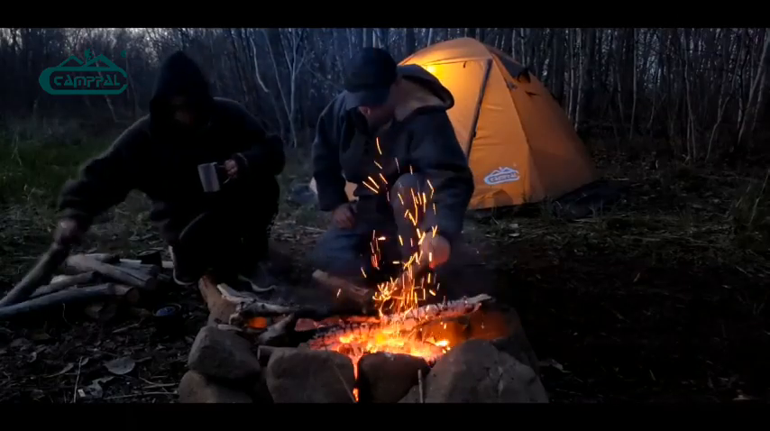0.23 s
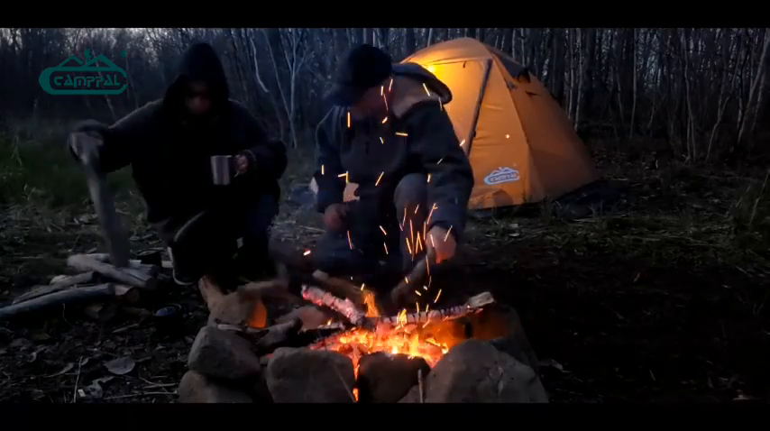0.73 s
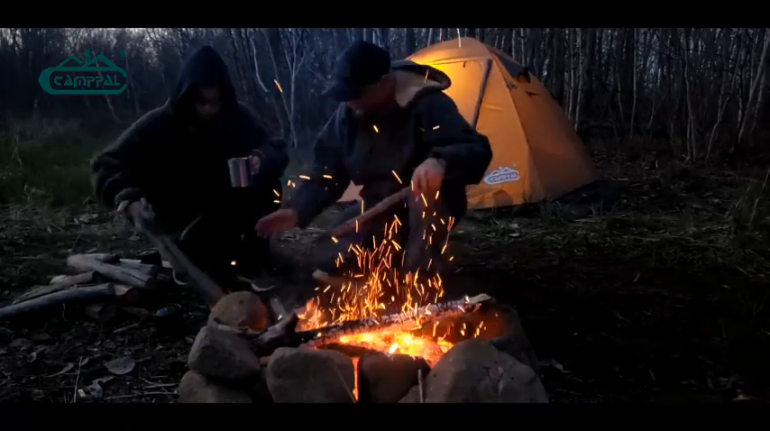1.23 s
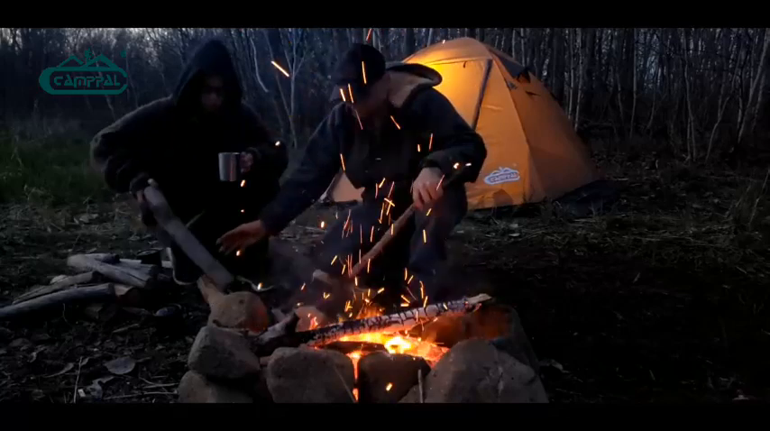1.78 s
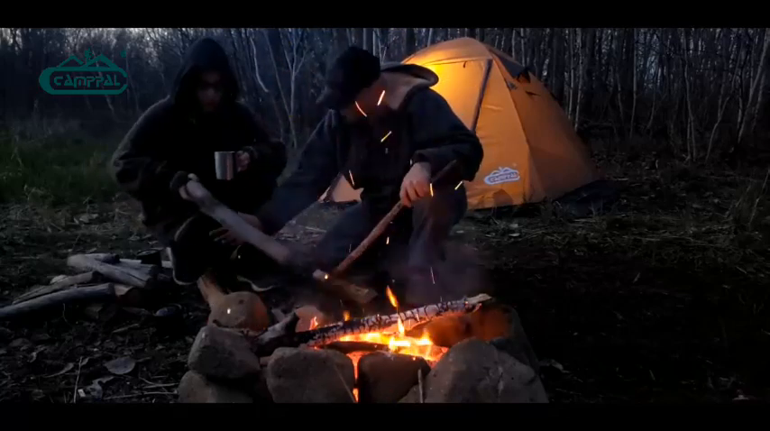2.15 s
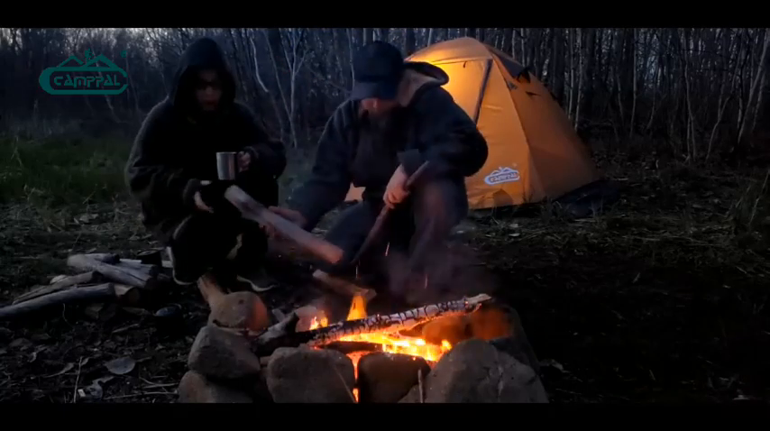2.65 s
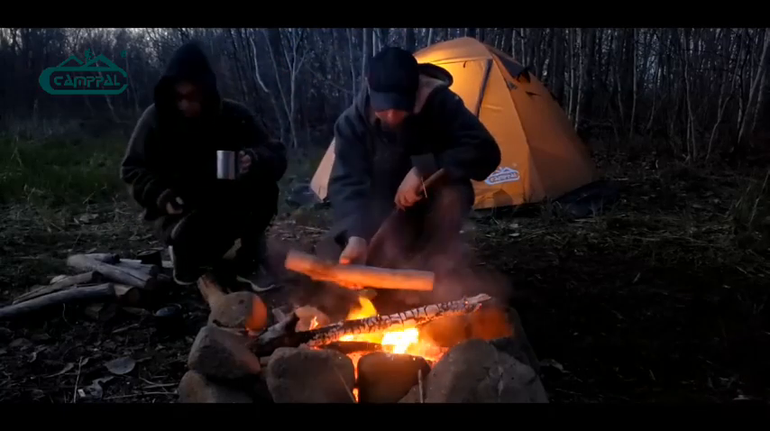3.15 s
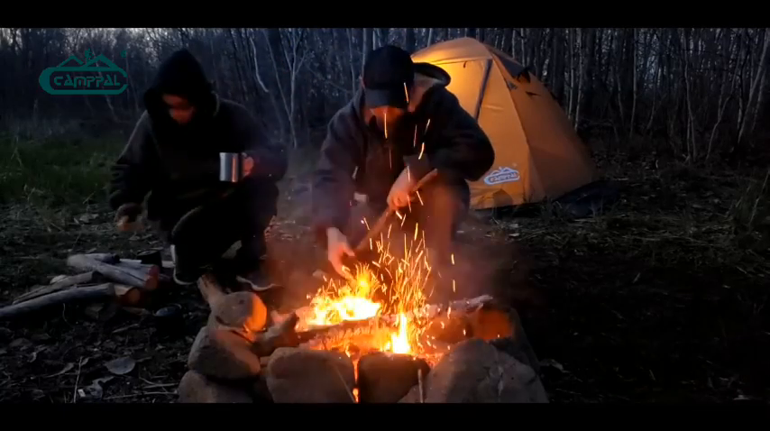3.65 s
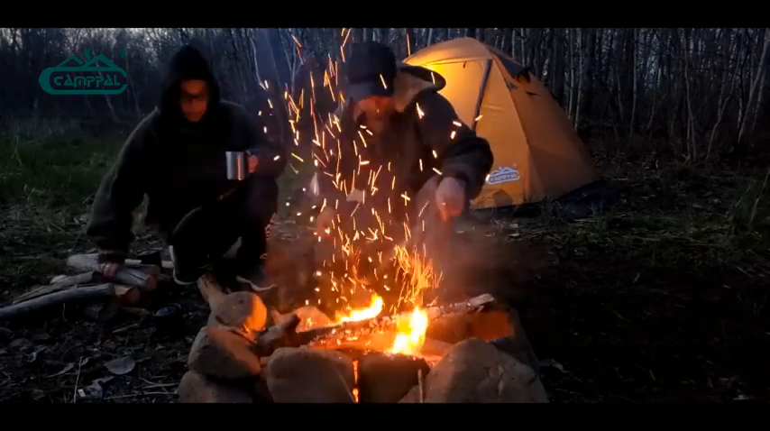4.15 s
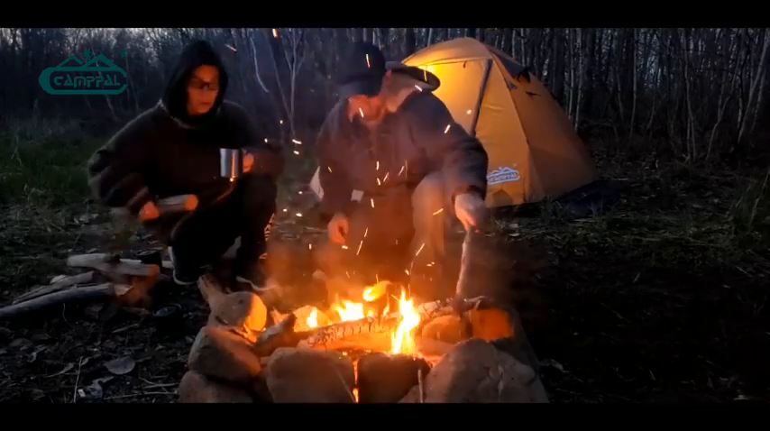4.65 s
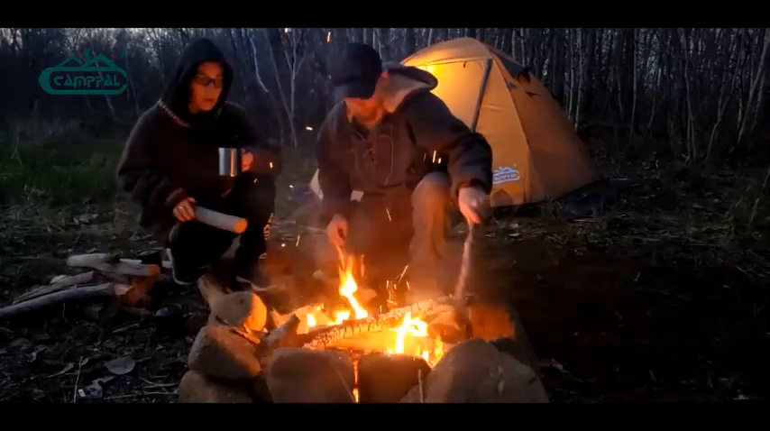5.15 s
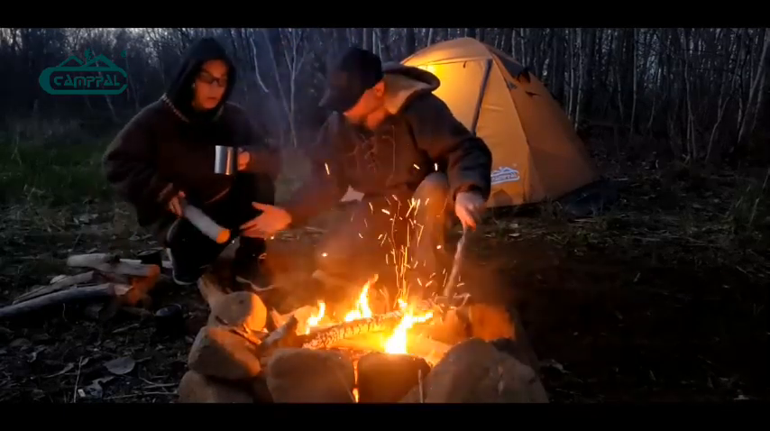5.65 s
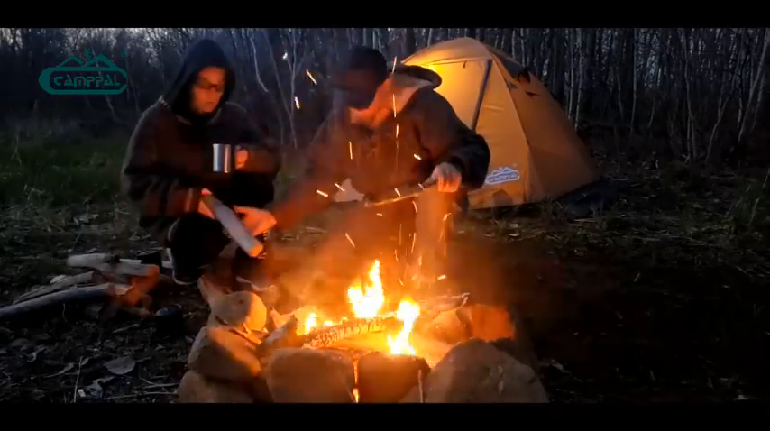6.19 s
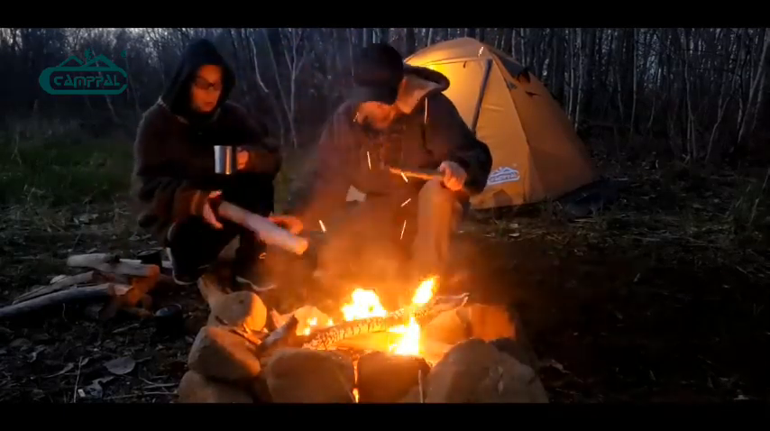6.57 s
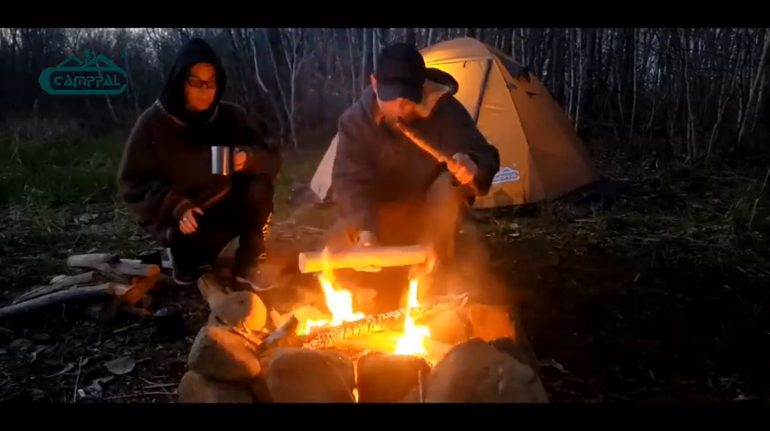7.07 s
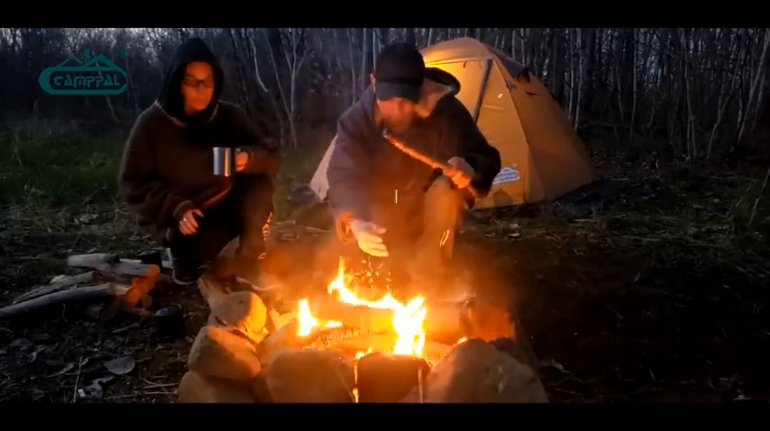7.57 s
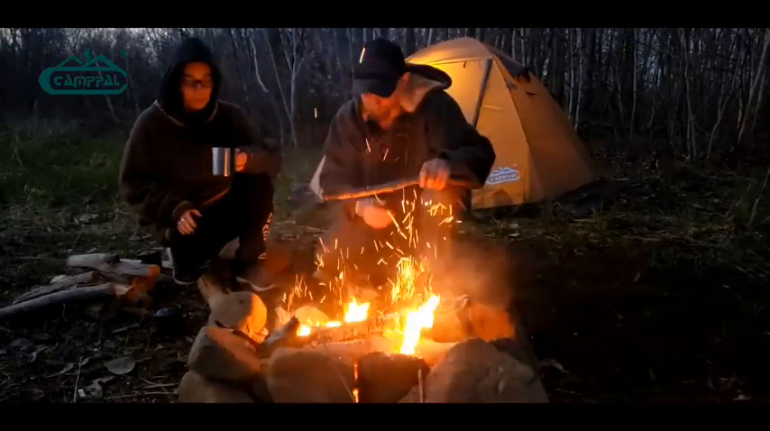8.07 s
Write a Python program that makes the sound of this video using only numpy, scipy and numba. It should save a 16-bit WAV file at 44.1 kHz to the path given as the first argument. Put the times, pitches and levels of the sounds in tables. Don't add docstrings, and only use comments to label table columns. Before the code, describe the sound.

Hundreds of high, short rising frog whistles blur into a steady ringing wall, with nearby embers snapping, wood knocking and flames throbbing low.

```python
import sys
import numpy as np
from scipy import signal
from scipy.fft import rfft, irfft
from scipy.io import wavfile
from scipy.ndimage import uniform_filter1d
from numba import njit

SR = 44100
rng = np.random.default_rng(int(sys.argv[2]) if len(sys.argv) > 2 else 0)


def volts_from_decibels(level):
    exponent = np.asarray(level, float) / 20
    return 10 ** exponent


def pcm_store(signal):
    levels = np.round(np.clip(np.atleast_2d(signal), -1, 1) * 32767)
    wavfile.write(sys.argv[1], SR, levels.astype(np.int16).T)


N = 367353

# t/s, level/dB
CHORUS = [
    (0.0, -16),
    (2.8, -16),
    (5.2, -15.5),
    (5.5, -14.5),
    (5.6, -17.5),
    (5.88, -17),
    (5.96, -16),
    (8.33, -16),
]
# middle t/s, f/Hz, level/dB
NEAR_PEEPS = [(0.968, 3070, -21), (1.173, 2720, -21), (1.498, 2910, -19), (1.704, 2734, -23.5),
              (1.899, 2848, -16.5), (2.629, 2762, -19), (2.753, 2690, -18), (2.788, 2950, -25),
              (2.894, 2870, -15), (3.132, 2974, -27), (3.38, 2726, -21.5), (3.492, 2805, -18.5),
              (3.612, 3073, -20), (3.76, 2842, -19.5), (4.074, 3003, -22), (4.277, 2670, -21),
              (4.722, 3064, -16.5), (4.819, 3027, -18.5), (5.036, 2926, -16.5), (5.319, 2990, -16.5),
              (5.37, 3140, -26), (5.45, 2906, -16), (5.947, 2760, -22.5), (5.974, 3076, -17),
              (6.134, 2928, -15), (6.548, 2880, -18), (6.6, 3020, -19), (6.941, 3040, -17.5),
              (8.118, 2656, -19), (8.279, 2903, -21)]
PARTIAL_DB = (-30.5, -35, -52.5)
FROG_HZ, FROG_SPREAD_HZ = 2994, 200
PEEP_S, RISE_HZ_PER_S = .082, 2700
WOODS_T60_S, WOODS_DB = 1, -5

# t/s, crackle level/dB
STIR = [(0.0, -55.5), (0.3, -50), (0.55, -43), (0.72, -59), (1.38, -59), (1.46, -72.5), (3.34, -66),
        (3.44, -55), (3.64, -55.5), (3.76, -63), (4.94, -59), (5.03, -50), (5.2, -49), (5.36, -57.5),
        (5.62, -58), (5.74, -78), (7.5, -65), (8.33, -69.5)]
# t/s, rumble level/dB, crackle level/dB, length/s
SETTLE = [
    (0.046, -49, -49, 0.087),
    (1.058, -52.5, -63, 0.37),
    (1.332, -45.5, -64.5, 0.13),
    (3.443, -36.5, -52, 0.3),
    (5.15, -53, -57.5, .12),
    (7.55, -35.5, -56.5, 0.071),
    (7.705, -40.5, -54.5, 0.17),
]
# t/s, throb level/dB
PUFFS = [(.31, -38), (.61, -40), (.92, -42), (1.07, -46), (1.23, -39), (1.389, -42), (1.69, -44),
         (1.86, -41.5), (2.12, -34), (2.43, -34.5), (2.75, -43), (2.9, -44.5), (3.42, -37), (3.67, -41),
         (3.98, -34), (4.25, -44.5), (4.45, -43), (4.73, -41), (4.89, -33), (5.2, -38), (5.54, -40.5),
         (5.84, -42), (6.471, -39), (6.779, -35), (7.06, -37), (7.22, -42.5), (7.63, -34.5), (7.8, -37),
         (7.94, -40), (8.27, -44)]
# t/s, flutter level/dB
FLAPS = [(.1, -47), (.23, -40.5), (1.12, -43), (1.39, -41.5), (3.42, -39), (3.57, -38.5), (4.68, -40),
         (4.86, -41), (5.11, -43.5), (5.24, -43.5), (5.34, -43), (5.52, -42), (7.58, -40), (7.78, -31)]
PUFF_S, FLAP_S, THROB_DB, FLUTTER_DB = .13, .08, -45.5, -50.5
COALS_DB, COALS_FOLLOW = -54, 0.22

# t/s, snap level/dB, body level/dB, thud level/dB, fade by 60 dB/s
BREAKS = [(.0409, -28.5, -26, -24.5, 0.011), (.088, -30.5, -42, -27, 0.05),
          (.1119, -35.5, -45, -19.5, 0.011), (.3893, -31, -26, -18, .015), (.5568, -36.5, -21, -24, 0.0098),
          (.8106, -16.5, -8.5, -16, 0.039), (.963, -35, -33, -30, 0.11), (1.0733, -26, -19.5, -20, .04),
          (1.3287, -41, -27.5, -31, 0.11), (1.6254, -51.5, -33.5, -27.5, .016),
          (2.1486, -31, -10, -24, 0.009), (3.375, -45, -27, -24.5, 0.053),
          (3.421, -23.5, -10.5, -19.5, 0.058), (3.4819, -32, -28, -21, 0.072),
          (3.6206, -25, -29, -38, 0.022), (4.3785, -14, -12.5, -19.5, 0.0096),
          (4.5929, -31.5, -37, -32, 0.038), (5.2435, -55.5, -42, -33, 0.069),
          (5.4845, -25, -40, -21, 0.012), (7.5371, -17, -20, -27, 0.048), (7.7044, -24, -26, -17.5, .087),
          (7.737, -6, -15.5, -22, .02), (7.8178, -46, -37, -30.5, 0.036), (7.859, -39.5, -39, -26, .014)]
# t/s, snap level/dB, body level/dB
SPARKS = [(.0068, -36.5, -40), (0.0546, -35.5, -34), (0.2397, -33.5, -23), (0.2693, -31.5, -32),
          (0.3098, -30, -21), (.4, -19, -27), (.421, -29.5, -29), (.438, -32, -38), (0.4896, -28, -32),
          (0.5057, -32.5, -26), (.572, -30, -26), (0.7414, -34.5, -39), (0.775, -34, -43),
          (0.8919, -24.5, -16), (2.8958, -45.5, -33.5), (3.3545, -31, -37), (3.5339, -36, -28),
          (4.3617, -49, -26.5), (4.5202, -36, -36), (4.7454, -23.5, -30), (5.026, -33.5, -28),
          (5.0439, -37.5, -30), (5.0999, -44.5, -37), (5.3197, -44.5, -34), (5.714, -49, -37),
          (6.5271, -40, -25), (6.862, -37.5, -40.5), (7.2532, -29.5, -44), (7.779, -26.5, -31),
          (8.1099, -39, -40.5)]
# t/s, snap level/dB, body level/dB
CRUNCHES = [(.0702, -36, -27.5), (0.1225, -38.5, -29), (.334, -41, -39), (.368, -27.5, -33),
            (.41, -30.5, -33.5), (0.5371, -41, -36), (.606, -36, -48), (.63, -48, -51), (0.6734, -44, -49),
            (0.7006, -40, -49), (0.8381, -36, -31), (.878, -38.5, -30), (0.9768, -48, -35),
            (1.091, -37.5, -24.5), (1.1752, -43.5, -46), (1.2537, -46, -35), (1.302, -46, -38),
            (1.372, -46, -49), (1.408, -44.5, -43.5), (3.57, -68, -26.5), (3.61, -43, -53),
            (5.1642, -32, -33.5), (5.296, -43, -59), (5.535, -42.5, -49), (5.5632, -36, -48),
            (5.6076, -39.5, -62), (7.585, -43, -49), (7.7977, -35.5, -51)]
# low f/Hz, high f/Hz
CRACK_BANDS = [
    (11000, 15500),
    (6800, 11000),
    (2300, 5300),
    (600, 2300),
    (110, 600),
]
SPARK_T60_S, CRUNCH_T60_S = .007, .085
EDGE_DB, SIZZLE_DB = 3, -17
SPARK_THUD_DB, CRUNCH_THUD_DB = -15, -13
GROUND_LAG_S, GROUND_DB = .006, -20

# t/s, peak level/dB, ring f/Hz, fade by 60 dB/s
KNOCKS = [(.391, -13, 980, 0.074), (.555, -15, 753, 0.02), (.812, -24, 1470, .04), (.812, -19, 305, 0.036),
          (1.088, -21, 1530, 0.13), (3.378, -27, 210, .06), (3.465, -26, 170, .2), (7.79, -39, 3930, .06),
          (3.372, -25.5, 1020, 0.15), (3.425, -19.5, 312, 0.11), (7.549, -21, 398, 0.04),
          (7.546, -31, 1017, 0.1), (7.562, -27, 70, .4), (7.705, -19, 617, .05), (2.149, -22, 1500, .022),
          (7.749, -27, 98.7, .4)]

# start t/s, length/s, low f/Hz, upward slur/Hz, level/dB
BIRD_NOTES = [(1.157, .2, 2325, 5.5, -58), (2.83, 0.27, 2316, -0.5, -57), (3.21, 0.17, 2140, 169.5, -55),
              (3.48, 0.34, 2270, 200, -53), (3.66, 0.23, 2345, 4.5, -56), (4.428, 0.27, 2210, 216, -57.5),
              (5.95, 0.16, 2090, 147.5, -59), (6.085, .35, 2066, 267.5, -49.5),
              (6.448, 0.2, 2225, 221, -51.5), (6.738, 0.045, 2320, 57.5, -50),
              (7.4, .31, 2080, 203.5, -47.5), (7.844, 0.23, 2260, 196, -56.5)]
DROP_HZ, DROP_S, SLUR_HZ_PER_S, TOP_S = 70, .018, 1500, .05

# f/Hz, level/dB per Hz
AIR_COLOUR = [(25, -15.5), (70, 2), (100, -6.5), (200, 0), (330, -11.5), (520, -23.5), (850, -9.5),
              (1200, -16.5), (2200, -13.5), (3800, -15), (5200, -30), (7000, -32.5), (10000, -37.5),
              (13000, -46.5)]
AIR_DB = -44


def band(x, lo_hz, hi_hz, order=2):
    sos = signal.butter(order, [lo_hz, hi_hz], "bandpass", fs=SR, output="sos")
    return signal.sosfilt(sos, x) * np.sqrt(SR / 2 / (hi_hz - lo_hz))


def level(x, db):
    return x * volts_from_decibels(db) / np.sqrt(np.mean(x ** 2))


def curves(table):
    s, *columns = np.transpose(table)
    return [np.interp(np.arange(N) / SR, s, c) for c in columns]


def walk(rate):
    k = int(SR / rate)
    steps = np.repeat(rng.standard_normal(N // k + 1), k)
    return uniform_filter1d(uniform_filter1d(steps, k), k)[:N]


def grit(count, scatter_db, lump_db):
    lumps = np.minimum(rng.exponential(size=count // 48 + 1), 5.0)
    lumps = np.repeat(lumps, 48)[:count]
    specks = np.minimum(rng.exponential(size=count), 6.0)
    return level(rng.standard_normal(count) * volts_from_decibels(scatter_db * specks + lump_db * lumps), 0)


def swells(s, db, length_s, rise=0.92):
    out = np.zeros(N)
    t = np.arange(N) / SR
    for at, size, wide in np.broadcast(s, volts_from_decibels(np.array(db)), length_s):
        near = slice(max(int((at - 2 * wide) * SR), 0), int((at + 2 * wide) * SR))
        u = (t[near] - at) / wide
        out[near] += size * np.exp(-2 * np.where(u < 0, u / rise, u) ** 2)
    return out


def woods(x):
    t = np.arange(SR) / SR
    tail = rng.standard_normal(SR) * volts_from_decibels(-60 * t / WOODS_T60_S) * np.minimum(t / 0.033, 1)
    tail = tail / np.sqrt(np.sum(tail ** 2))
    return x + volts_from_decibels(WOODS_DB) * signal.fftconvolve(x, tail)[:N]


def partials(hz):
    tilt_db = np.array([[12], [-35], [0]]) * np.log2(hz / FROG_HZ)
    return volts_from_decibels(np.array(PARTIAL_DB)[:, None] + tilt_db).T.copy()


@njit
def peeps(middle_s, hz, size, length_s, rise, partial):
    out = np.zeros(N + 2 * SR)
    for k in range(len(hz)):
        n = int(length_s[k] * SR)
        start = int((middle_s[k] + 1) * SR) - n // 2
        if start < 0 or start > N + SR:
            continue
        z = 1 + 0j
        turn = np.exp(1j * np.pi * (hz[k] - rise[k] * length_s[k] / 2) / SR)
        glide = np.exp(1j * np.pi * rise[k] / SR ** 2)
        for i in range(n):
            z *= turn
            turn *= glide
            u, z2 = i / n, z * z
            shape = 2.6 * u * (1 - u * u)
            voice = z2 + partial[k, 0] * z + partial[k, 1] * z2 * z + partial[k, 2] * z2 * z2
            out[start + i] += size[k] * shape * voice.imag
    return out[SR:N + SR]


def frogs(count=620):
    pitch, far, pace, lag, size = rng.standard_normal((count, 5)).T[:, :, None]
    slip = rng.standard_normal((3, count, 12))
    middle_s = lag % 1 - 1.3 + np.cumsum(.95 + .08 * pace + .06 * slip[0], axis=1)
    pitch = np.clip(pitch, -1.95, 2.1)
    hz = FROG_HZ + FROG_SPREAD_HZ * pitch + 55 * slip[1]
    size_db = 3.32 * far + 2.5 * slip[2] - 1.8 * pitch ** 2
    length_s = PEEP_S * (1 + .12 * size + .12 * slip[0])
    rise = RISE_HZ_PER_S * (1 + 0.2503 * pace + 0.299 * slip[0])
    rows = middle_s, hz, volts_from_decibels(size_db), length_s, rise
    crowd = woods(peeps(*(r.ravel() for r in rows), partials(hz.ravel())))
    crowd = crowd / np.sqrt(uniform_filter1d(crowd ** 2, SR // 8))
    s, near_hz, near_db = np.transpose(NEAR_PEEPS)
    near = peeps(s, near_hz, volts_from_decibels(near_db + 3.0), PEEP_S + 0 * s, RISE_HZ_PER_S + 0 * s, partials(near_hz))
    return crowd * volts_from_decibels(curves(CHORUS)[0] + 0.57) + woods(near)


def fire():
    stir_db = curves(STIR)[0]
    s, rumble_db, crackle_db, length_s = np.transpose(SETTLE)

    embers = band(grit(N, 2.5, 3.8), 5500, 15000, order=1) * volts_from_decibels(-4.5 + 3.0 * walk(41))
    embers *= volts_from_decibels(stir_db) + swells(s, crackle_db, length_s, rise=.1)

    coals = band(grit(N, 3.5, 3.3), 73, 700) * volts_from_decibels(2.6 * walk(20))
    coals *= volts_from_decibels(COALS_DB + COALS_FOLLOW * (stir_db + 68)) + swells(s, rumble_db, length_s, rise=.12)

    throb = np.sin(2 * np.pi * np.cumsum(48 + 3.7 * walk(5.5)) / SR)
    throb = level(throb + 0.45 * band(rng.standard_normal(N), 37, 70), 0)
    throb *= volts_from_decibels(THROB_DB) + swells(*np.transpose(PUFFS), .7 * PUFF_S) * volts_from_decibels(-2.0)

    flap = np.sin(2 * np.pi * np.cumsum(97 + 5.0 * walk(9)) / SR)
    flap *= swells(*np.transpose(FLAPS), .7 * FLAP_S) * volts_from_decibels(5.5)
    flutter = band(rng.standard_normal(N), 80, 110) * volts_from_decibels(FLUTTER_DB)
    return embers + coals + throb + flap + flutter


def cracks():
    push = np.zeros((len(CRACK_BANDS), N + SR))
    t = np.arange(SR // 8) / SR
    rows = [tuple(row) for row in BREAKS]
    rows += [(s, snap, body, body + SPARK_THUD_DB, SPARK_T60_S) for s, snap, body in SPARKS]
    rows += [(s, snap, body, body + CRUNCH_THUD_DB, CRUNCH_T60_S) for s, snap, body in CRUNCHES]
    for s, snap_db, body_db, thud_db, t60 in rows:
        t60 = max(t60, .003)
        edge_db = (snap_db + body_db) / 2 + EDGE_DB
        fade = np.minimum(t / (0.042 * t60), 1) * volts_from_decibels(-60 * (t / t60) ** 0.88)
        fade += volts_from_decibels(-39.5 - 60 * t / 0.4)
        burst = grit(len(t), 0.88, 1.8) * fade
        burst *= np.sqrt(np.sum(fade ** 2) / np.sum(burst ** 2))
        bands_db = np.array([snap_db + SIZZLE_DB, snap_db - 5.0, edge_db + 0.5, body_db, thud_db])
        push[:, int(s * SR):][:, :len(t)] += volts_from_decibels(bands_db)[:, None] * burst
    near = sum((-1) ** k * band(push[k, :N], *edges) for k, edges in enumerate(CRACK_BANDS))
    return near + volts_from_decibels(GROUND_DB) * np.roll(near, int(GROUND_LAG_S * SR))


def knocks():
    out = np.zeros(N + SR)
    t = np.arange(SR // 2) / SR
    for s, db, hz, t60 in KNOCKS:
        ring = volts_from_decibels(db - 60 * t / t60) * np.sin(2 * np.pi * hz * t)
        out[int(s * SR):][:len(t)] += ring * np.minimum(t / .0015, 1)
    return out[:N]


def bird():
    out = np.zeros(N)
    for s, length_s, low_hz, slur_hz, db in BIRD_NOTES:
        t = np.arange(0, length_s, 1 / SR)
        gate = np.minimum(np.minimum(t, length_s - t) / .015, 1)
        below_hz = np.clip((length_s - TOP_S - t) * SLUR_HZ_PER_S, 0, slur_hz)
        hz = low_hz + slur_hz - below_hz
        hz = hz + DROP_HZ * (length_s > .2) * np.exp(-t / DROP_S)
        turn = uniform_filter1d(hz, SR // 40, mode="nearest") / SR
        out[int(s * SR):][:len(t)] += gate * volts_from_decibels(db + 10.5) * np.sin(2 * np.pi * np.cumsum(turn))
    out = out * volts_from_decibels(3.0 * walk(45))
    return .5 * out + .4 * woods(out)


def air():
    hz = np.maximum(np.fft.rfftfreq(N, 1 / SR), 1)
    colour_hz, colour_db = np.transpose(AIR_COLOUR)
    gain_db = np.interp(np.log(hz), np.log(colour_hz), colour_db)
    hiss = irfft(rfft(rng.standard_normal(N)) * volts_from_decibels(gain_db), N)
    return level(hiss * volts_from_decibels(.5 * walk(0.8)), AIR_DB + 0.8)


def scene():
    return (frogs() + fire() + cracks() + knocks() + bird() + air())[None]


def roll_off(x):
    return signal.sosfilt(signal.butter(12, 16010, fs=SR, output="sos"), x)


def record(dry):
    dull = signal.sosfilt(signal.butter(1, 10000, fs=SR, output="sos"), dry)
    dull = dull * np.minimum(np.arange(N)[::-1] / 150, 1)
    return roll_off(np.clip(dull, -.98, .98))


dry = scene()
out = record(dry)
pcm_store(out)
```